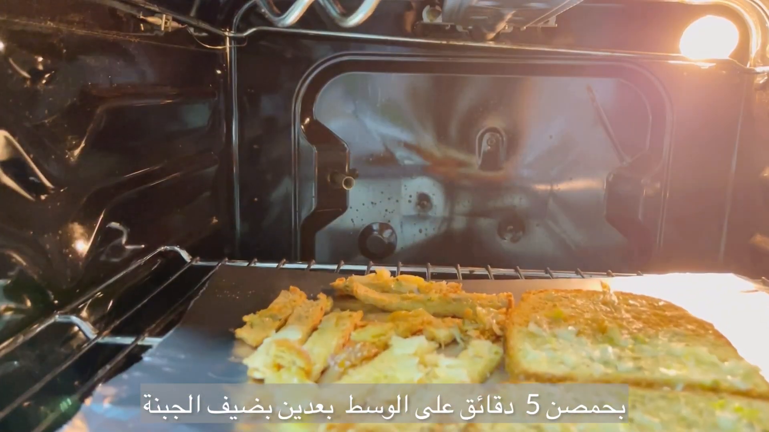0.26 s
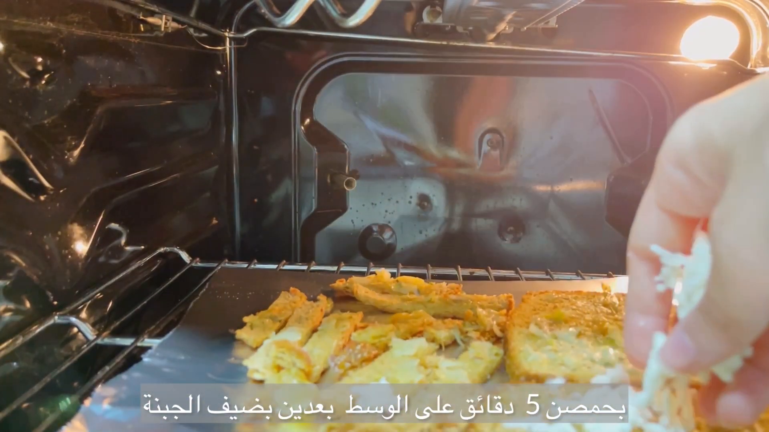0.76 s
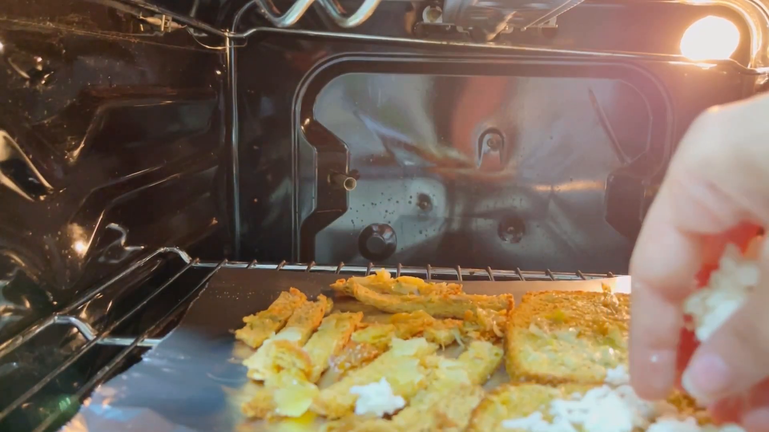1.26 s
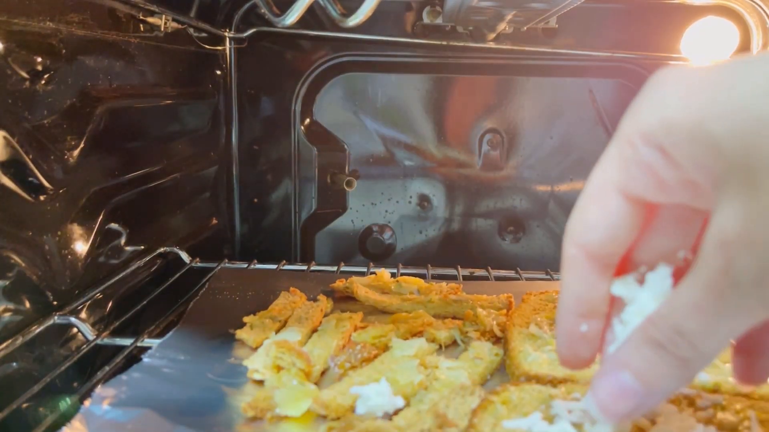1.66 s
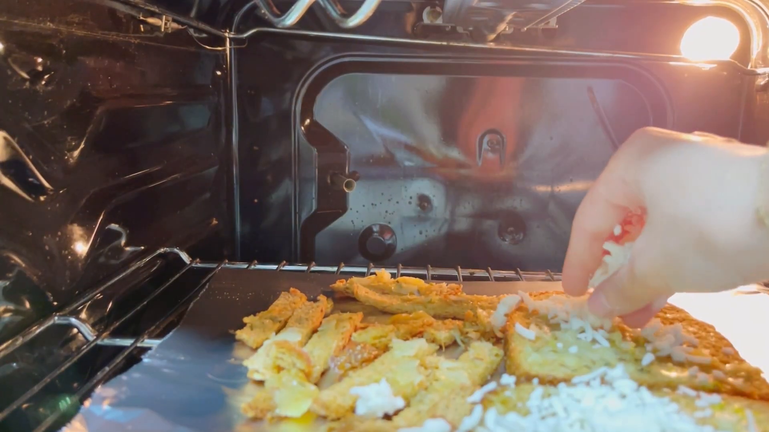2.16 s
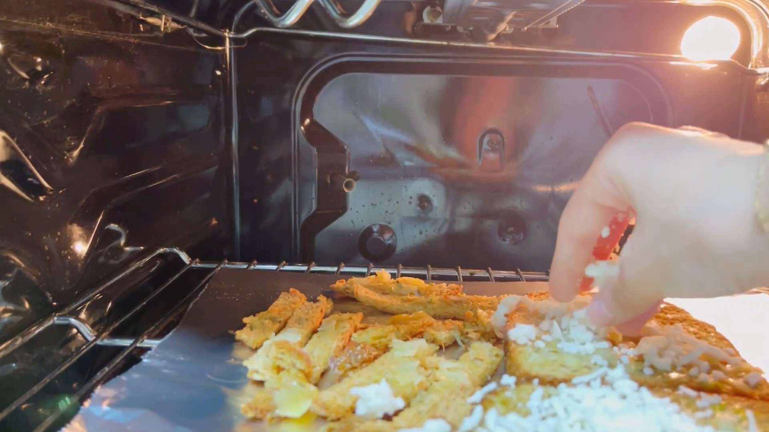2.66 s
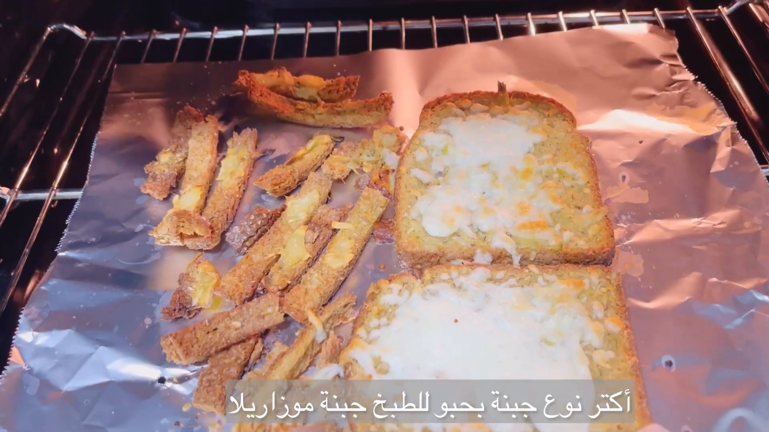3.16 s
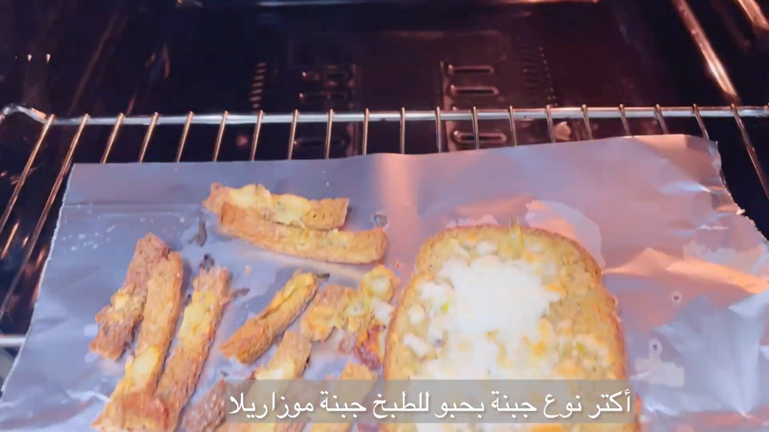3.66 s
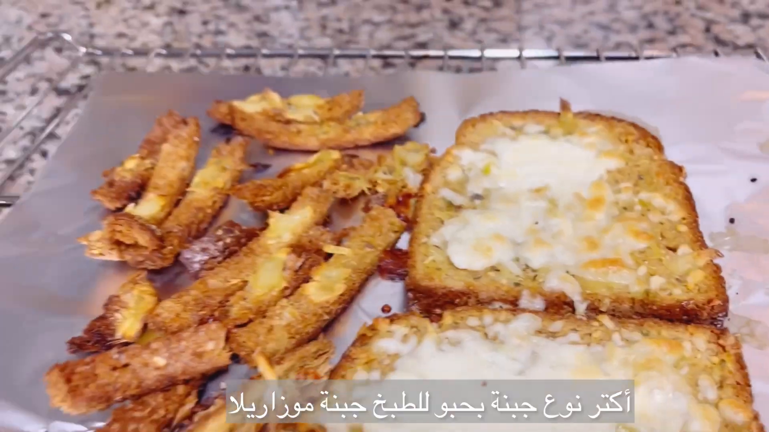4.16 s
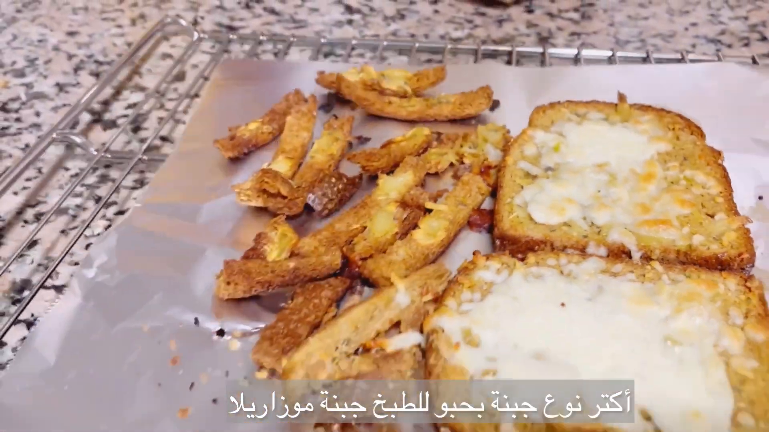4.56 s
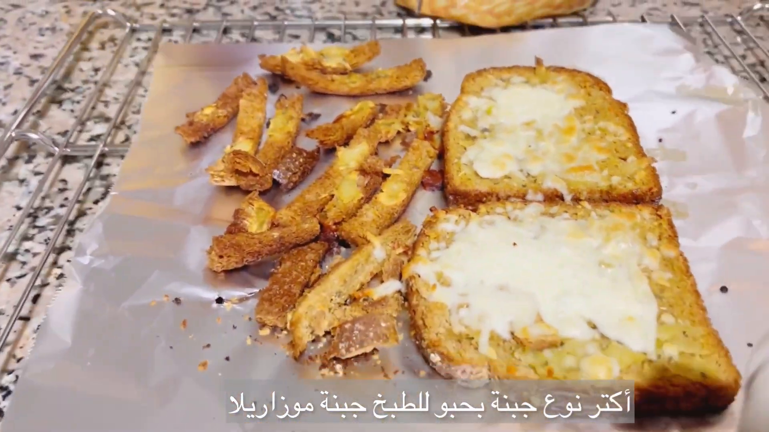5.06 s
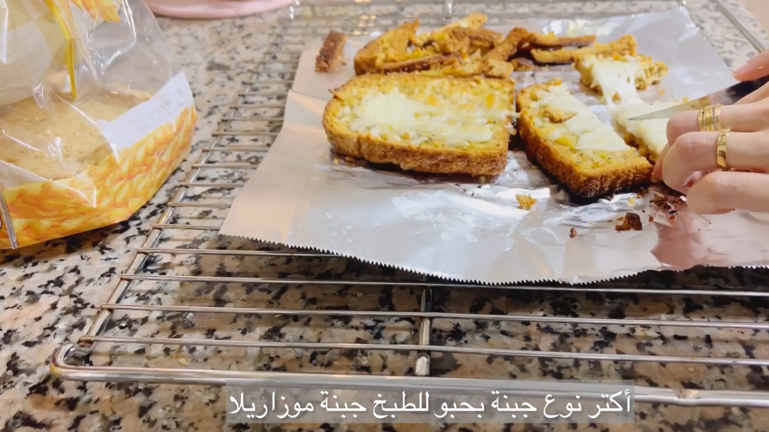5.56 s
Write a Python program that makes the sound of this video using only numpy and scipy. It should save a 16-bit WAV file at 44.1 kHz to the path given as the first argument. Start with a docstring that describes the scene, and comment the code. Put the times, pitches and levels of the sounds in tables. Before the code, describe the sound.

A wire oven rack bangs and rattles into a humming oven, later scrapes out, clatters onto a stone counter, and foil crackles sharply.

```python
"""In a small kitchen, a wire rack with a foil-lined tray bangs into a humming oven; its steel and panels ring.
Shreds of cheese patter, as fine noise grains, over the toast on it; then the rack is knocked and dragged out.
It drops on a stone counter and is shoved about: struck and rubbed noise excites its resonances and wires.
Last, the foil crackles under a knife in short snaps of noise.
Heard close by two microphone ports that ring at 10 to 11 kHz; the level dips briefly four times."""
import sys
import numpy as np
from scipy import signal
from scipy.fft import rfft, irfft, next_fast_len
from scipy.io import wavfile
from scipy.ndimage import uniform_filter1d, map_coordinates

SR = 44100
rng = np.random.default_rng(int(sys.argv[2]) if len(sys.argv) > 2 else 0)


def transcribe(signal):
    """Save signal, clipped to [-1, 1], as a 16-bit WAV file at the path in sys.argv[1]."""
    frames = np.atleast_2d(signal).T
    limited = np.clip(frames, -1, 1)
    pcm = np.round(limited * 32767).astype(np.int16)
    wavfile.write(sys.argv[1], SR, pcm)


N = 255780

# Levels in the event tables are relative: the trims passed in scene() shift them.
# resonances of the rack and oven walls: [f/Hz, width/Hz before sharpening, level/dB]
OVEN_MODES = [(532, 30, 0), (866, 27, 11), (972, 40, -6), (1054, 25, 7), (1134, 24, -1.5),
              (1650, 38, -16.5), (1904, 66, -1), (2250, 68, -8)]
# booming modes of the oven's sheet panels: [f/Hz, t60/s, level/dB]
PANEL_MODES = [(110.4, 0.27, -3), (207.6, 0.18, -10), (248, 0.14, -3), (287.3, 1, -27)]
JINGLE_HZ, CLANG_HZ, THUD_HZ = (8080, 21700), (410, 6270), (63.6, 304)  # band edges


def oven_blows(jingle_db, clang_db, thud_db, contact_t60, rise):
    """The rack hits its rails; the oven's sheet panels boom along, mostly under the heaviest blows."""
    # blows of the rack in the oven: [t/s, clang level/dB, jingle level/dB re clang, thud level/dB]
    blows = [(0.0014, -25.5, -0.5, -28), (0.0156, -28.5, -22, -33), (0.022, -24.5, -13, -36),
             (0.0435, -36, -5, -35), (0.131, -33, -13, -37.5), (0.2403, -41, 19.5, -58),
             (0.27, -38.5, -9, -40.5), (0.3217, -35.5, 8, -41.5), (3.008, -36, 1.5, -42),
             (3.0165, -29.5, 17, -40), (3.447, -48.5, -7, -38.5), (3.565, -60, 9, -53)]
    # the walls ring less as the rack is eased out: [t/s, level/dB]
    wall_ring = [(0.4, 3), (3.0, -11.5)]
    heavy_db, boom_db = -28.5, 9  # a heavy thud, and the panel boom re that thud
    boom_grows = 2.22  # dB of boom per dB of thud
    build_up_cycles = 0.29  # cycles that a panel mode takes to build up
    out = np.zeros((2, N))
    for s, db, bright, thud in blows:
        x = clatter(contact_t60, ring_db=-9)
        t = np.arange(x.shape[1]) / SR
        panels = 0
        for hz, t60, mode_db in PANEL_MODES:
            build_up = np.minimum(t * hz / build_up_cycles, 1)
            panels = panels + amp(mode_db - 60 * t / t60) * np.sin(2 * np.pi * hz * (s + t)) * build_up
        ring_db = np.interp(s, *np.transpose(wall_ring))
        body = steel(x, OVEN_MODES, modes_db=ring_db, sharpness=1.13, dull_hz=2760, scatter_db=3)
        clang = amp(clang_db) * struck(band(body, CLANG_HZ))
        jingle = amp(bright + jingle_db) * struck(band(x, JINGLE_HZ))
        low = amp(thud + thud_db) * struck(band(x, THUD_HZ), size=900)
        boom = amp(heavy_db + boom_db + boom_grows * (thud - heavy_db)) * panels
        grip = np.minimum(t / rise, 1)
        add(out, s, amp(db) * grip * (jingle + clang) + low + boom)
    return out


def rail_slides(jingle_db, clang_db, drone_db):
    """The rack rubs lumpily along the rails with a fine hiss, scuffs over their lip, and the panels drone along."""
    # the rack sliding on the oven's rails: [start t/s, swell/s, t60/s, rub level/dB, jingle level/dB re rub]
    pushes = [(0.005, 0.049, 0.13, -35, -0.5), (0.05, 0.03, 0.27, -46.5, 12),
              (0.125, 0.088, 0.25, -49.5, -9), (0.265, 0.018, 0.17, -40.5, 7), (0.3, 0.051, 0.13, -46, -4),
              (3.06, 0.036, 0.045, -42, -12.5), (3.16, 0.44, 0.64, -47.5, -12),
              (3.562, 0.013, 0.031, -49.5, 13), (3.935, 0.016, 0.55, -62.5, -6)]
    # colour of wire rubbing on rail: [f/Hz, relative level/dB]
    rub_colour = [(300, 16), (480, 4), (650, 7), (900, -5), (1300, 2), (2000, 0), (3000, -4.5),
                  (4100, -4.5), (5000, -7.5), (7000, -4.5)]
    drone_grows, firm_rub_db = 0.56, -44.5  # dB of panel drone per dB of rub; a firm rub
    scuff_s, scuff_db = 3.445, -43.5  # the rack starts to drag over the rail's lip
    oven_cut_s = 4.013  # the oven scene is cut here, and the rubbing with it
    clang, jingle = slides(pushes, swell_db=5.5, grip_s=0.038)
    drone = amp(firm_rub_db + drone_db) * (clang / amp(firm_rub_db)) ** drone_grows
    x = patchy(grains(rate=1400, spread_db=4, bed_db=0.0), depth_db=2.5)
    rub = filtered(x, lambda hz: amp(along(rub_colour, hz)))
    rub = steel(rub, OVEN_MODES, modes_db=4.0, sharpness=1.0, dull_hz=12000)
    scuff = patchy(grains(rate=600, spread_db=-2, bed_db=14), depth_db=-0.5)
    scuff = unit(band(scuff, (835, 2040), order=2))
    scuff = scuff * amp(scuff_db) * stroke(scuff_s, swell_s=0.072, t60=0.16, swell_db=9, grip_s=0.01)
    hiss = amp(jingle_db) * jingle * unit(band(x, JINGLE_HZ))
    rub = amp(clang_db) * clang * unit(band(rub, CLANG_HZ))
    before_cut = np.arange(N) / SR < oven_cut_s
    return before_cut * (hiss + rub + scuff + drone * panel_drone())


def counter_blows(rows, jingle_db, clang_db, thud_db, ring_db, contact_t60, rise):
    """The free rack meets the stone, the contact building over rise seconds, and rings on; heavy blows thud."""
    settled_s = 4.7  # the rack lies flat from here on
    drop_db, thud_grows = -16.5, 1.8  # clang of the full drop; dB of thud per dB of clang
    thump_hz, thump_t60, thump_db = 80.8, 0.12, 4  # the counter's low thump (Hz, s, dB re thud)
    out = np.zeros((2, N))
    for s, db, bright in rows:
        x = clatter(contact_t60, ring_db)
        modes = rack_modes(s > settled_s)
        body = steel(x, modes, modes_db=-6.5, sharpness=0.84, dull_hz=5500, scatter_db=3)
        clang = amp(db + clang_db) * struck(band(body, CLANG_HZ))
        t = np.arange(x.shape[1]) / SR
        thump = np.sin(2 * np.pi * thump_hz * (s + t)) * amp(-60 * t / thump_t60)
        thump = thump * np.minimum(t * thump_hz, 1)  # builds up over one cycle
        low = struck(band(x, THUD_HZ), size=900) + amp(thump_db) * thump
        low = amp(drop_db + thud_db + thud_grows * (db - drop_db)) * low
        grip = np.minimum(t / rise, 1)
        jingle = amp(db + bright + jingle_db) * struck(band(x, JINGLE_HZ))
        add(out, s, grip * jingle + bending(grip * (clang + low)))
    return out


def counter_slides(jingle_db, clang_db):
    """Wire skids over polished stone: a fine, bright scrape whose resonances come and go."""
    # the rack skidding on the counter: [start t/s, hold/s, t60/s, rub level/dB, jingle level/dB re rub]
    pushes = [(4.48, 0.07, 0.36, -48.5, 6.5), (4.55, 0.14, 1, -48.5, -14), (4.716, 0.05, 0.67, -40.5, -2),
              (4.96, 0.022, 0.19, -39.5, -3.5), (5.182, 0.033, 0.14, -45.5, 18),
              (5.224, 0.028, 0.38, -32.5, 1.5)]
    clang, jingle = slides(pushes, swell_db=-4.5, grip_s=0.021)
    x = patchy(grains(rate=1400, spread_db=4, bed_db=-2), depth_db=2.5)
    body = steel(x, rack_modes(settled=True), modes_db=1.0, sharpness=1.0, dull_hz=6000)
    body = patchy(body, depth_db=1.5)
    scrape = amp(jingle_db) * jingle * unit(band(x, JINGLE_HZ))
    return scrape + amp(clang_db) * clang * unit(band(body, (330, 7000)))


def rack_modes(settled):
    """The rack's resonances, bouncing freely or lying on the stone."""
    # [f/Hz, width/Hz before sharpening, level/dB while it bounces, level/dB once it lies flat on the stone]
    modes = [(461, 29, -6, 4), (647, 41, -8, -39), (820, 20, -3, -5), (934, 22, -17, 11.5),
             (1174, 26, 6, -1), (1370, 19, -14, 0), (1620, 120, 2.5, -11.5), (2003, 31, 6.5, -13),
             (2290, 49, 2, -8), (2660, 59, -10, -6), (3110, 280, -4, 0), (4000, 240, -8, 2)]
    return [(hz, width, flat_db if settled else free_db) for hz, width, free_db, flat_db in modes]


def bending(x):
    """Low bending waves travel slowly through the rack, so a blow sweeps quickly downwards."""
    lag_s, lag_hz = 0.011, 100  # lag at that frequency; it falls with the root of frequency
    return filtered(x, lambda hz: np.exp(-4j * np.pi * lag_s * np.sqrt(hz * lag_hz)))


def wires(x, ring_db, t60, count=340):
    """The rack's many bending modes: narrow lines that ring on after every contact."""
    t = np.arange(SR // 3) / SR
    hz = 900 + 11800 * (np.arange(count) + rng.random(count))[:, None] / count
    modes = np.sin(2 * np.pi * (hz * t + rng.random((count, 1))))
    ring = unit(modes.sum(0) * amp(-60 * t / t60)) / np.sqrt(len(t))
    ringing = signal.fftconvolve(x, ring[None], axes=1)[:, :N]
    return (x + amp(ring_db) * ringing) / np.hypot(1, amp(ring_db))


def swishes():
    """A shove sets the foil tray sliding at once: a dense, bright crackle."""
    # the tray swishing along with a shove: [start t/s, swell/s, t60/s, level/dB]
    shoves = [(5.184, 0.031, 0.17, -33.5), (5.231, 0.0097, 0.41, -36)]
    push = sum(amp(db) * stroke(s, swell_s, t60, swell_db=3, grip_s=0.0067) for s, swell_s, t60, db in shoves)
    x = grains(rate=2000, spread_db=5, bed_db=-5)
    return push * unit(band(x, (2810, 6000), order=2))


def foil(snap_db, body_db, snap_t60, room_db, crumple_db, crumple_body_db):
    """Foil and crust snap drily over a rustle of much finer creases."""
    # dry snaps of foil and crust: [t/s, snap level/dB, body level/dB]
    snaps = [(0.866, -48, -56), (0.978, -45, -50), (1.114, -45, -59), (1.168, -43, -72), (1.6728, -48, -54),
             (2.727, -51, -59), (3.2068, -28.5, -41.5), (3.421, -38.5, -46), (4.22, -31, -44),
             (4.2613, -27, -46), (5.0672, -23.5, -41), (5.1742, -28, -41), (5.1833, -28, -34),
             (5.1902, -17.5, -33), (5.2103, -21, -33), (5.2318, -6, -32), (5.417, -28.5, -41.5),
             (5.4437, -26, -44), (5.449, -22, -52), (5.477, -24, -44), (5.508, -23, -44), (5.523, -24, -48),
             (5.5475, -23.5, -50), (5.567, -25, -42.5), (5.6015, -28, -53), (5.627, -39, -50),
             (5.6503, -34, -54), (5.6726, -26.5, -44), (5.7068, -23, -40.5), (5.7925, -25.5, -39.5)]
    # foil creasing under the toast: [start t/s, swell/s, t60/s, level/dB]
    creases = [(4.122, 0.012, 0.38, -63), (4.23, 0.052, 0.1, -52), (5.405, 0.12, 0.58, -56),
               (5.5, 0.023, 0.54, -46.5), (5.76, 0.022, 0.44, -48)]
    out = np.zeros((2, N))
    for s, db, body in snaps:
        x = clatter(snap_t60, room_db)
        snap = amp(db + snap_db) * struck(band(x, JINGLE_HZ), size=130)
        add(out, s, snap + amp(body + body_db) * struck(band(x, (1300, 7800), order=2), size=130))
    pressure = sum(amp(db) * stroke(s, swell_s, t60, swell_db=9, grip_s=0.0075)
                   for s, swell_s, t60, db in creases)
    x = grains(rate=1000, spread_db=5, bed_db=-5)
    rustle = amp(crumple_db) * unit(band(x, JINGLE_HZ))
    rustle = rustle + amp(crumple_body_db) * unit(band(x, (2000, 7800), order=2))
    return out + pressure * rustle


def taps(knock_db, click_db, tink_db, room_db):
    """Light contacts: a short hollow knock and a two-note tink with a click on top."""
    # light taps in the oven and on the way out: [t/s, knock level/dB, pitch f/Hz, second note f/Hz,
    # ring level/dB re knock, click level/dB re knock, contact t60/s]
    contacts = [(0.14, -43, 886, 1080, 6, -20, 0.05), (0.272, -44, 872, 1060, 7, -20, 0.04),
                (0.779, -40, 1540, 3900, -16, -9, 0.065), (0.802, -58, 1710, 3900, -15, -10, 0.033),
                (1.8065, -48.5, 1830, 4740, 2, -18, 0.031), (1.81, -48, 1240, 1190, 1, -22, 0.038),
                (1.862, -53, 2420, 3460, -9, -27, 0.054), (3.164, -45.5, 243, 295, 13, -22, 0.069),
                (3.336, -46, 1984, 1740, 4, -10, 0.079), (3.457, -46.5, 825, 1110, 11, -25, 0.042),
                (3.509, -42, 1224, 2210, 1, -22, 0.058), (3.523, -55, 1660, 1190, 5, -22, 0.047),
                (4.131, -47.5, 764, 940, 1.5, -26, 0.019), (4.192, -45, 845, 1790, -1, -8, 0.036),
                (4.223, -49, 790, 1500, -13, -15, 0.03), (4.238, -45.5, 710, 900, -3, -20, 0.023),
                (4.261, -41.5, 1210, 1500, -4, -20, 0.081)]
    out = np.zeros((2, N))
    for s, db, hz, second_hz, ring, click, t60 in contacts:
        x = clatter(t60, room_db)
        t = np.arange(x.shape[1]) / SR
        knock = amp(knock_db) * struck(band(x, (hz * 0.14, hz * 2.3), order=1), size=200)
        notes = np.sin(2 * np.pi * hz * t) + 0.33 * np.sin(2 * np.pi * second_hz * t)
        tink = amp(ring + tink_db) * notes * amp(-60 * t / (2 * t60))  # outlasts the contact
        top = amp(click + click_db) * struck(band(x, JINGLE_HZ), size=200)
        add(out, s, amp(db) * (knock + tink + top))
    return out


def dry_clicks():
    """Dry clicks on the stone: a single swing or two over a faint echo."""
    # dry clicks on stone: [t/s, level/dB, pitch f/Hz]
    clicks = [(4.9843, -22, 1900), (4.989, -35, 1200), (5.0325, -21.5, 2620), (5.0485, -30, 1100),
              (5.1355, -16, 1990)]
    die_cycles, echo_db = 3, -26  # cycles to fall by 60 dB; the echo off the counter
    out = np.zeros((2, N))
    for s, db, hz in clicks:
        echo = struck(band(clatter(contact_t60=0.03, ring_db=-9.5), (600, 5000), order=1), size=200)
        cycles = hz * np.arange(echo.shape[1]) / SR
        swing = np.sin(2 * np.pi * cycles) * amp(-60 * cycles / die_cycles)
        add(out, s, amp(db) * (band(swing, (700, 6000), order=2) + amp(echo_db) * echo))
    return out


def cheese(db, body_db):
    """Grated cheese patters softly onto the toast while the hand sprinkles it."""
    # patter of falling shreds: [t/s, level/dB]
    patter = [(0.451, -76.5), (0.77, -72.5), (0.98, -67), (1.66, -69), (1.92, -77.5), (2.7, -76.5),
              (2.95, -78.5)]
    t = np.arange(N) / SR
    sprinkling = np.clip(np.minimum(t - patter[0][0], patter[-1][0] - t) / 0.16 + 1, 0, 1)
    x = grains(rate=200, spread_db=4, bed_db=6)
    shreds = amp(db) * unit(band(x, (7200, 11000)))
    shreds = shreds + amp(body_db) * unit(band(x, (2500, 7500), order=2))
    return sprinkling * level(patter) * shreds


def oven_hum(hum_db, fan_db, rumble_db):
    """Mains hum that wavers a little, the panels' drone, the cooling fan's air and the kitchen's low rumble."""
    # level of the mains hum: [t/s, level/dB]
    hum_level = [(0, -56), (1.3, -48.5), (1.75, -53.5), (2.4, -47.5), (3.1, -59.5), (5.8, -91)]
    # lines of the hum: [f/Hz, level/dB]
    hum_lines = [(100, -2.5), (200, -17.5), (300, -15.5)]
    # level of the panels' drone: [t/s, level/dB]
    drone_level = [(0, -45), (0.45, -51), (0.9, -66), (2.9, -62), (3.95, -58), (4.1, -73)]
    # level of the fan's air: [t/s, level/dB]
    fan_level = [(0, -61), (3.8, -61), (4.1, -64)]
    # colour of the fan's air: [f/Hz, relative level/dB per Hz]
    air_colour = [(130, -7), (220, -6), (300, -13.5), (380, -9.5), (700, -12), (1000, -13), (1500, -15.5),
                  (2700, -20), (3700, -30), (6000, -38), (9000, -49.5), (14000, -35)]
    # resonances of that air in the oven: [f/Hz, width/Hz, level/dB]
    duct_modes = [(522, 45, -10), (945, 36, -2), (1070, 70, -2.5), (1600, 16, 4.5), (2290, 70, -3.5)]
    # colour of the rumble: [f/Hz, relative level/dB per Hz]
    rumble_colour = [(12, -53.5), (20, -21.5), (59, 5.5), (108, 0.5), (155, -11.5), (247, -15), (274, -4),
                     (300, -44.5), (390, -40), (660, -120)]
    t = np.arange(N) / SR
    hum = sum(amp(db + 2.3 * wobble(6)) * np.sin(2 * np.pi * hz * t + .6 * wobble(8)) for hz, db in hum_lines)
    air = steel(noise(air_colour), duct_modes, modes_db=0.0, sharpness=1.0, dull_hz=20000)
    air = unit(patchy(air, depth_db=1.5))
    oven = amp(hum_db) * level(hum_level) * hum + level(drone_level) * panel_drone()
    return oven + amp(fan_db) * level(fan_level) * air + amp(rumble_db) * noise(rumble_colour)


def panel_drone():
    """The oven's sheet panels, shaken at random, at rms 1."""
    modes = [(hz, 6 / t60, db) for hz, t60, db in PANEL_MODES]  # short-lived modes are wide
    x = steel(rng.standard_normal((2, N)), modes, modes_db=23, sharpness=1, dull_hz=485)
    return unit(band(x, (135, 400)))


def clatter(contact_t60, ring_db):
    """A burst of chattering contact, with dense ringing whose decay depends on frequency."""
    # ringing steel in the kitchen: [f/Hz, t60/s]
    ring_t60 = [(100, 0.83), (260, 0.44), (700, 0.33), (1840, 0.38), (4850, 0.39), (12800, 0.2)]
    t = np.arange(SR * 3 // 4) / SR
    hz, when, z = signal.stft(rng.standard_normal((2, len(t))), SR, nperseg=256)
    fade = amp(-60 * when / along(ring_t60, hz)[:, None])
    ring = signal.istft(z * fade, SR, nperseg=256)[1][:, :len(t)]
    return rng.standard_normal(ring.shape) * amp(-60 * t / contact_t60) + amp(ring_db) * ring


def steel(x, modes, modes_db, sharpness, dull_hz, scatter_db=0):
    """Contact noise, falling above dull_hz, plus the resonances it excites, each more or less by chance."""
    # each contact point favours other resonances
    luck = scatter_db * np.clip(rng.standard_normal(len(modes)), -2, 1)

    def response(f):
        body = 0
        for (centre, width, db), own in zip(modes, luck):
            damping = 1j * f * width / sharpness
            body = body + amp(db + own) * damping / (centre * centre - f * f + damping)
        return (1 + amp(modes_db) * body) / (1 + 1j * f / dull_hz)

    return filtered(x, response)


def grains(rate, spread_db, bed_db):
    """Tiny slips of uneven size at random moments, rate a second, on a bed of fine friction noise."""
    slips = (rng.random(N) < rate / SR) * amp(spread_db * np.minimum(rng.standard_normal(N), 2))
    click = rng.standard_normal((2, 128)) * np.exp(-np.arange(128) / 24)
    clicks = unit(signal.fftconvolve(slips[None], click, axes=1)[:, :N])
    return clicks + amp(bed_db) * rng.standard_normal((2, N))


def patchy(x, depth_db):
    """Gains that drift at random over time and frequency let different resonances take turns to speak."""
    z = signal.stft(x, nperseg=1024)[2]
    field = rng.standard_normal(z.shape[1:])
    field = uniform_filter1d(uniform_filter1d(field, 4, 0), 4, 1)
    return signal.istft(z * amp(depth_db * unit(field)), nperseg=1024)[1][:, :N]


def stroke(s, swell_s, t60, swell_db, grip_s):
    """A push grips within grip_s, swells by swell_db to its peak and dies; below 0 dB it holds, then dies."""
    t = np.arange(N) / SR - s
    shape_db = np.minimum(swell_db * (t / swell_s - 1), -60 * (t - swell_s) / t60)
    return np.clip(t / grip_s, 0, 1) * amp(np.minimum(shape_db, 0))


def slides(rows, swell_db, grip_s):
    """Gains of the rub and the jingle over a series of pushes, adding in power."""
    pushes = [stroke(s, swell_s, t60, swell_db, grip_s) * amp([[db], [db + bright]])
              for s, swell_s, t60, db, bright in rows]
    return np.linalg.norm(pushes, axis=0)


def amp(db):
    """Amplitude of a level in dB."""
    return 10 ** (np.asarray(db) / 20)


def unit(x):
    """Scale to rms 1."""
    return x / np.sqrt(np.mean(x ** 2) + 1e-20)


def struck(x, size=400):
    """Scale a blow so that its first samples, size of them, have rms 1."""
    return x / np.sqrt(np.mean(x[:, :size] ** 2) + 1e-20)


def along(points, hz):
    """Read (Hz, value) points on a log frequency axis."""
    f, v = np.transpose(points)
    return np.interp(np.log(hz + 1), np.log(f + 1), v)


def level(rows):
    """One gain per sample from (s, dB) points."""
    return amp(np.interp(np.arange(N) / SR, *np.transpose(rows)))


def wobble(rate):
    """A smooth random curve, rate knots a second."""
    return map_coordinates(rng.standard_normal(int(N * rate / SR) + 4), [np.arange(N) * rate / SR])


def filtered(x, response):
    """Multiply the spectrum of x by a response of frequency."""
    m = next_fast_len(x.shape[-1] + SR // 2)
    return irfft(rfft(x, m) * response(np.fft.rfftfreq(m, 1 / SR)), m)[..., :x.shape[-1]]


def band(x, edges_hz, order=3):
    """Causal band-pass."""
    edges_hz = np.minimum(edges_hz, SR / 2 - 1)
    return signal.sosfilt(signal.butter(order, edges_hz, 'band', fs=SR, output='sos'), x)


def noise(spectrum):
    """Coloured noise of rms 1 at both ports."""
    return unit(filtered(rng.standard_normal((2, N)), lambda hz: amp(along(spectrum, hz))))


def add(track, s, sound):
    """Mix a sound in at time s."""
    part = track[:, max(round(s * SR), 0):][:, :sound.shape[-1]]
    part += sound[..., :part.shape[-1]]


def dips():
    """Gain that drops suddenly at each dip and recovers."""
    # the level dips briefly: [t/s]
    dip_times = [0.596, 1.764, 4.013, 5.392]
    depth_db, recovery_s = -15, 0.015
    age = np.arange(N) / SR - np.array(dip_times)[:, None]
    return amp(depth_db * ((age > 0) * np.clip(1 - age / recovery_s, 0, 1)).sum(0))


def scene():
    """The rack in the oven and on the counter, the food and foil on it, and the oven's hum."""
    # blows of the rack on the counter: [t/s, clang level/dB, jingle level/dB re clang]
    hits = [(4.2856, -20.5, 16.5), (4.2895, -28, 3), (4.3555, -34.5, -3), (4.4223, -33.5, 19.5),
            (4.4285, -30, 16.5), (4.5165, -47.5, 17), (4.9374, -38, 22.5), (5.2313, -29, 9)]
    # glancing contacts that swell instead of striking: [t/s, clang level/dB, jingle level/dB re clang]
    grazes = [(4.3513, -34.5, 18.5), (4.455, -35, 15.5), (4.755, -38, 13.5), (4.9448, -37.5, 12.5),
              (5.1833, -53, 19.5)]
    in_oven = oven_blows(jingle_db=-7.0, clang_db=0.0, thud_db=-3.5, contact_t60=0.062, rise=0.0034)
    in_oven = in_oven + rail_slides(jingle_db=3.5, clang_db=1.5, drone_db=-7.0)
    on_counter = counter_blows(hits, jingle_db=-9.5, clang_db=-2.0, thud_db=-12, ring_db=-9,
                               contact_t60=0.07, rise=0.00042)
    on_counter = on_counter + counter_blows(grazes, jingle_db=-7.5, clang_db=0.0, thud_db=-5.0, ring_db=4.0,
                                            contact_t60=0.4, rise=0.0042)
    on_counter = on_counter + counter_slides(jingle_db=3.5, clang_db=-1.5) + swishes()
    rack = wires(in_oven + on_counter, ring_db=-12.0, t60=0.16)
    crackle = foil(snap_db=-9, body_db=-3.0, snap_t60=0.025, room_db=-14.5,
                   crumple_db=-0.5, crumple_body_db=-6.5)
    touches = taps(knock_db=-5.0, click_db=-34, tink_db=-0.5, room_db=-13.0) + dry_clicks()
    food = cheese(db=0.5, body_db=-5.5)
    return rack + crackle + food + touches + oven_hum(hum_db=1.5, fan_db=2.5, rumble_db=-57.5)


def record(dry):
    """The two ports share the bass, ring in the treble and drift apart in phase through that resonance."""
    # likeness of left and right: [f/Hz, correlation]
    likeness = [(100, 0.98), (300, 0.89), (600, 0.45), (1300, 0.41), (3000, 0.5), (7000, 0.68), (8500, 0.9),
                (13000, 1)]
    # resonance of the microphone ports: [f/Hz, level/dB]
    port_ring = [(6000, -0.5), (7300, 0), (8300, 3.5), (9300, 2.5), (10200, 6), (11200, 7), (12200, -8),
                 (13000, -11), (14000, -46.5), (15200, -29), (16500, -43)]
    # left minus right: [f/Hz, level/dB]
    left_lean = [(150, -0.5), (1500, 0.5), (3000, 2.5), (7000, 4.5), (8500, 0.3), (10500, -0.5)]
    # phase by which the left leads: [f/Hz, phase/rad]
    left_lead = [(300, 0), (1500, .2), (3000, -.5), (6000, -.3), (7500, -.8), (8600, 0), (10250, np.pi),
                 (11200, 4.7), (12000, 2 * np.pi), (12500, 6.7), (13400, 3 * np.pi), (15000, 12)]
    top_hz = 16200  # nothing is heard above
    sign = np.array([[1], [-1]])  # left, right

    def share(hz):
        turn = np.arccos(np.clip(along(likeness, hz), -1, 1)) / 2
        return np.array([np.cos(turn), np.sin(turn)])

    def port(hz):
        colour = amp(along(port_ring, hz) + sign * along(left_lean, hz) / 2)
        lag = np.exp(-1j * along(left_lead, hz) * (sign < 0))
        return colour * lag * (hz < top_hz)

    mid, side = filtered(dry * dips(), share)
    return filtered(mid + sign * side, port)


dry = scene()
out = record(dry)
transcribe(out)
```